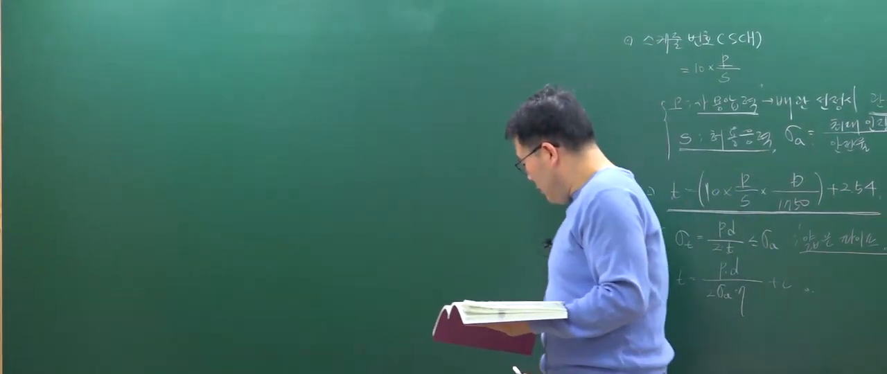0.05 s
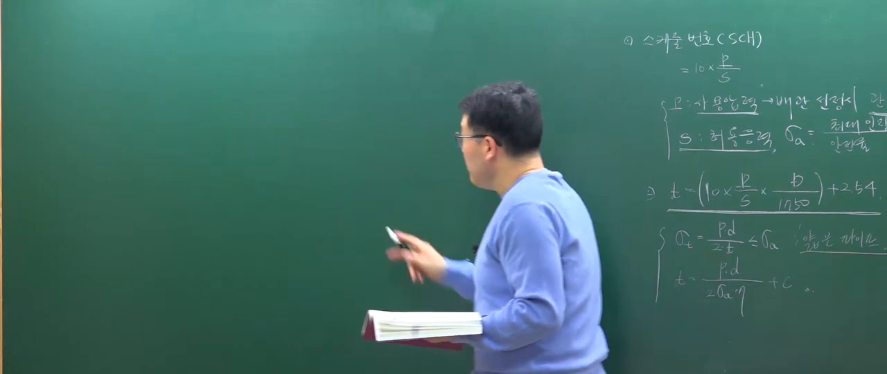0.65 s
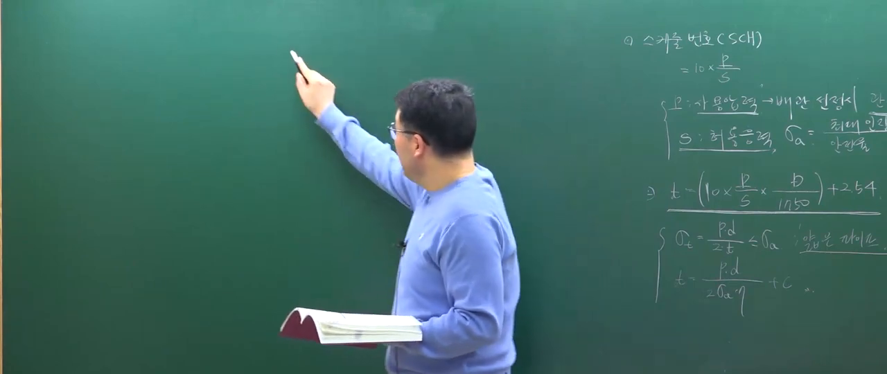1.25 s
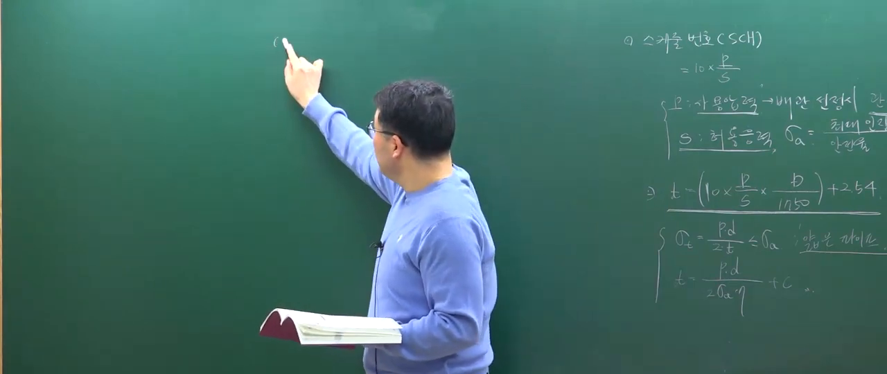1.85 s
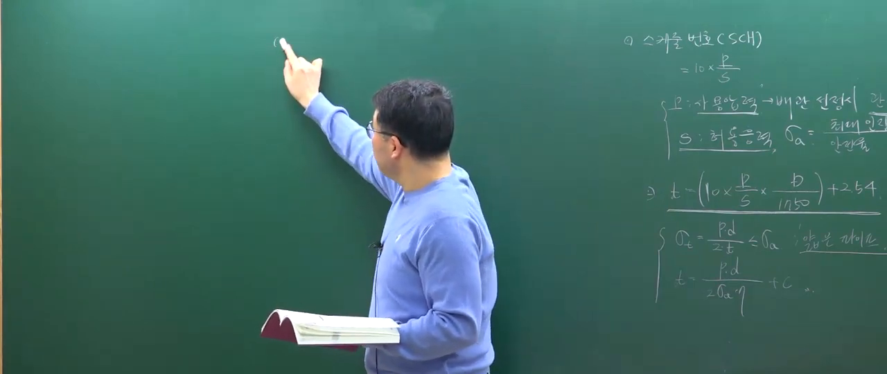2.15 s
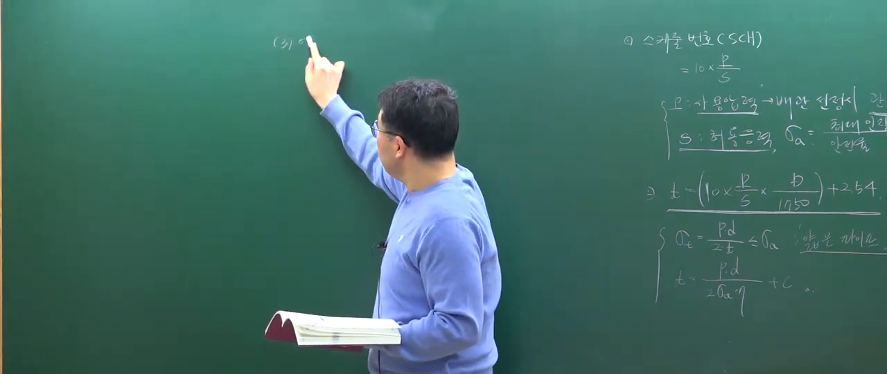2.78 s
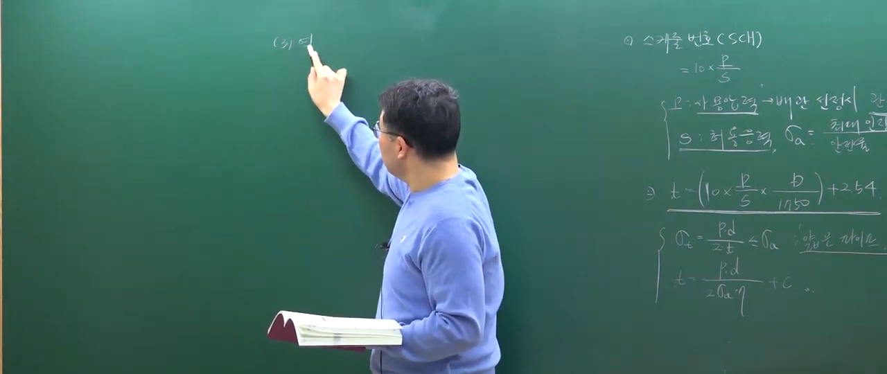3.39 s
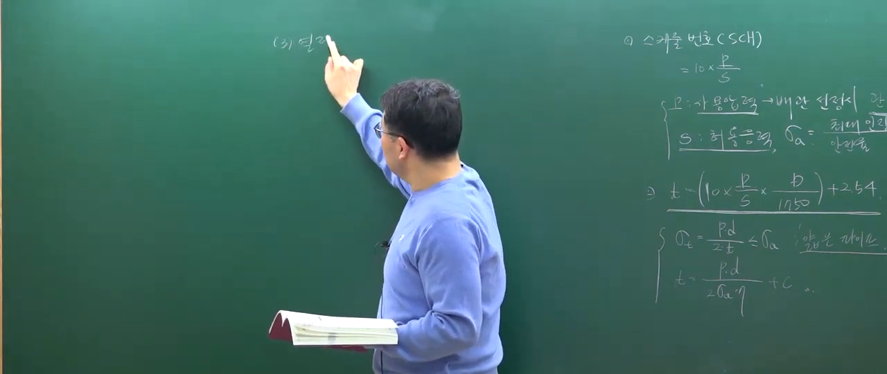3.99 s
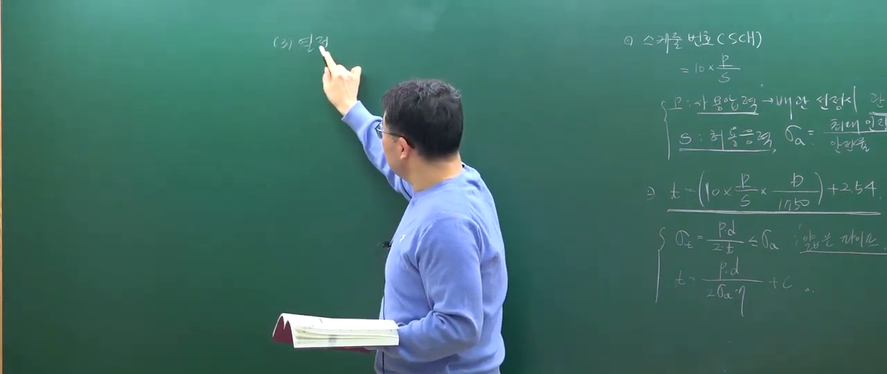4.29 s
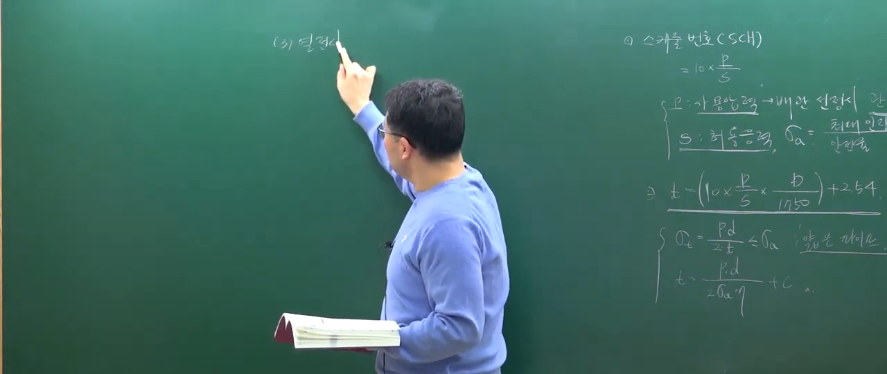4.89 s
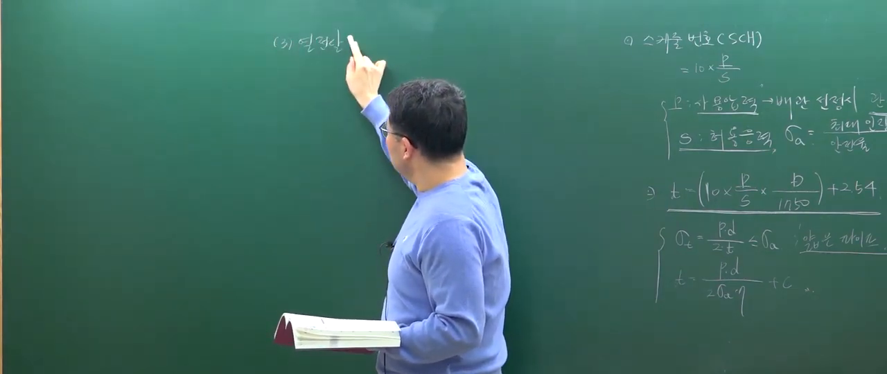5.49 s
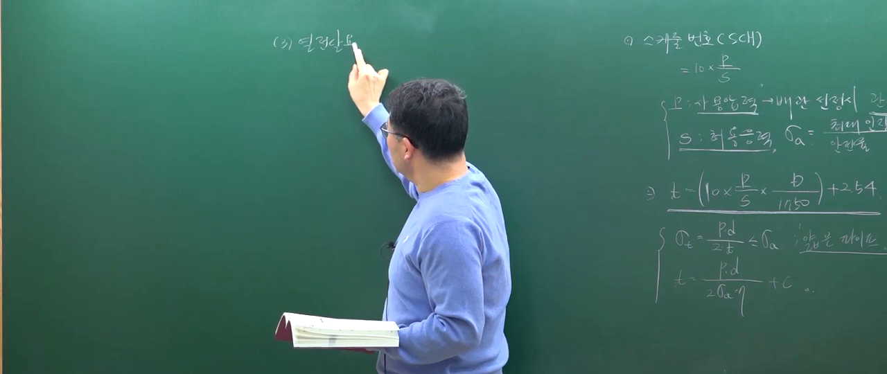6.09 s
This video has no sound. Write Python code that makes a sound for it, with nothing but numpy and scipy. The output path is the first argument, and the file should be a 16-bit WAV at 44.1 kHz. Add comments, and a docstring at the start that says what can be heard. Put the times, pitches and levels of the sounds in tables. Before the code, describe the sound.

Chalk taps and crunches on a large blackboard in an echoing classroom, after a brief clatter, a few knocks and a sleeve rustle.

```python
"""One microphone by a large blackboard in a live classroom, over low ventilation and hiss. Further off,
something clatters on the chalk ledge; the writer shifts with soft bumps, the ledge knocks three times
and a sleeve rustles as the arm goes up. Then the writing: each stroke starts with a firm tap, the chalk
tip crunches, the panel knocks and booms and the room rings on. After most taps the chalk slides away
with a faint gritty hiss."""
import sys
import numpy as np
from scipy import signal
from scipy.fft import rfft, irfft
from scipy.io import wavfile
from scipy.ndimage import uniform_filter1d

SR = 44100
rng = np.random.default_rng(int(sys.argv[2]) if len(sys.argv) > 2 else 0)


def digitize_waveform(pressure):
    """Quantize a signal to 16-bit integers and store it at the path in sys.argv[1].

    Rows of a 2-D input are taken as channels; values are limited to [-1, 1].
    """
    field = np.atleast_2d(pressure).T
    bounded = np.clip(field, -1, 1)
    quanta = np.round(bounded * 32767).astype(np.int16)
    wavfile.write(sys.argv[1], SR, quanta)


N = 275492
TIME = np.arange(N) / SR

# ventilation and hiss (frequency [Hz], level [dB])
ROOM_TONE_SPECTRUM = [(25, -14), (55, -1.5), (110, -6), (200, -11), (350, -30), (700, -27), (1500, -36),
                      (3500, -42.5), (15000, -41.5)]
# decay of the classroom's echo (frequency [Hz], t60 [s])
ECHO_DECAY = [(80, 0.9), (200, 0.65), (450, 1.0), (1200, 1.21), (2200, 0.96), (4500, 0.62), (8000, 0.47),
              (14000, 0.7)]
# colour of that echo (frequency [Hz], gain [dB])
ECHO_SPECTRUM = [(60, 0.5), (200, -4.5), (400, -2), (700, -4.5), (1300, -4.5), (2500, -5), (5000, -7.5),
                 (8000, -15.5), (14000, -25.5)]
# blows on the ledge (time [s], rattle level [dB], rattle length [s], level of the modes [dB])
CLATTER_BLOWS = [(0.016, -36, 0.0054, -30), (0.021, -42.5, 0.0047, -40.5), (0.027, -28.5, 0.07, -51),
                 (0.057, -31.5, 0.012, -47), (0.0625, -32.5, 0.11, -31.5), (0.075, -29, 0.021, -41)]
KNOCK_BLOWS = [(.737, -34.5, 0.029, -34.5), (.840, -32, 0.049, -36), (.902, -38.5, 0.058, -37)]
# their rattle, bright and dull (frequency [Hz], level [dB])
CLATTER_SPECTRUM = [(60, 1.5), (200, 4), (500, -1.5), (830, -2), (1200, 1.5), (1900, 3), (3200, -3),
                    (5000, -12), (8500, -18.5), (11000, -33), (15000, -39)]
KNOCK_SPECTRUM = [(40, -3.5), (100, -8), (170, 4), (270, -10), (380, 1), (480, 2), (600, -1.5),
                  (760, -12.5), (1200, -11), (2800, -20.5), (5000, -35), (14000, -48)]
# modes of the ledge (frequency [Hz], level [dB], t60 [s])
CLACK_MODES = [(560, -6, .014), (850, 0, .014), (1250, -8, .01)]
THUD_MODES = [(143.2, -7, 0.29), (254, 5.5, 0.083), (352, -5, 0.03)]
# soft bumps as the body shifts (time [s], level [dB], length [s])
BODY_BUMPS = [(.62, -49.5, 0.45), (.719, -39, 0.023), (1.211, -38, 0.026), (1.24, -38, 0.01),
              (1.295, -42, 0.069), (1.37, -55, 0.058)]
# sleeve sliding (middle time [s], length [s], level [dB])
SLEEVE_MOVES = [(1.25, 0.072, -52), (1.325, 0.033, -57)]
# colour of the bumps and of the sleeve (frequency [Hz], level [dB])
BUMP_SPECTRUM = [(30, -1), (90, 4.5), (165, 9), (270, -13.5), (480, -10), (750, -33), (1800, -24.5),
                 (4000, -59), (15000, -68)]
SLEEVE_SPECTRUM = [(200, 14.5), (1900, 2), (3500, -10), (6000, -14), (9500, -6), (15000, -13)]
# chalk landings (time [s], gain [dB], hardness [dB/octave], favoured band [Hz], hollow band [Hz], # weak band
# of the stick [Hz])
CHALK_TAPS = [(1.5767, -1.5, -1.5, 770, 218, 2500), (1.8503, 0, -0.5, 408, 1240, 3490),
              (2.2583, 2.2, 1.05, 353, 1240, 3640), (2.5415, -2, 0.5, 1920, 734, 3560),
              (2.9009, -0.5, 1.24, 930, 520, 3020), (3.0549, -7, -1.6, 821, 350, 1810),
              (3.323, 0.9, -0.1, 1760, 790, 2380), (3.6441, 3.5, .4, 1000, 643, 3040),
              (3.9455, -2.5, -.2, 1000, 340, 2700), (4.2898, 2.5, 0.8, 523, 1070, 2930),
              (4.4537, -.7, 0.34, 1360, 850, 2340), (4.7718, 3.5, 0.5, 1370, 860, 2230),
              (5.0274, -6, -0.34, 1170, 188, 2770), (5.1856, 2, .7, 1370, 580, 2180),
              (5.476, 2.5, -0.05, 1330, 660, 3240), (5.8262, -2, -0.3, 554, 926, 2550),
              (6.2225, 0.5, 0.96, 1730, 1010, 3550)]
# the panel bending, and the spot under the chalk giving way (frequency [Hz], level [dB], t60 [s])
BENDING_MODES = [(116.8, 0, 0.26), (150, -4, 0.33), (214.5, -9.5, 0.84), (233, 3.5, 0.09), (305, 0, 0.041),
                 (377.4, 6, 0.13), (449.2, 5, 0.12), (504, 4, 0.074)]
SPOT_MODES = [(208, 11.5, 0.027), (918, 10, 0.014), (1470, 1, 0.016)]
# dense upper panel modes, crushed chalk, what the panel sends into the room (frequency [Hz], level [dB])
PANEL_SPECTRUM = [(80, -4), (450, -11), (660, -22), (920, 3.5), (1500, -6.5), (2100, -10), (3200, -23.5),
                  (6000, -26), (15000, -32)]
CRUSH_SPECTRUM = [(200, -61), (1200, 22), (2400, 12), (3400, -0.5), (5000, -2), (7000, -3.5), (10000, -9),
                  (15000, -17.5)]
RADIATED_SPECTRUM = [(45, -17), (80, -19), (110, -8), (220, -2), (440, -3.5), (620, -12), (1000, -9),
                     (1600, -15.5), (2300, -24.5), (3100, -33), (4200, -33), (6500, -30.5), (10000, -31.5),
                     (15000, -31.5)]
# chalk sliding (middle time [s], length [s], level [dB])
CHALK_SLIDES = [(1.68, 0.13, -64), (1.94, 0.053, -61), (2.08, 0.14, -67), (2.81, 0.14, -74),
                (3.16, .16, -71), (3.42, 0.084, -60.5), (3.50, .05, -85), (4.18, 0.13, -73),
                (4.62, 0.064, -76), (4.91, 0.087, -64), (5.68, 0.1, -79), (5.97, .08, -66)]
# its gritty hiss (frequency [Hz], level [dB])
SLIDE_SPECTRUM = [(300, -20), (1500, -2), (4000, -35), (8000, 0), (15000, 4)]


def undb(db):
    """Decibels to gain."""
    return 10 ** (np.asarray(db) / 20)


def unit(x):
    """Scale to an rms of 1."""
    return x / np.sqrt(np.mean(x ** 2))


def at_level(x, db):
    """Scale a short sound so that its energy, spread over 40 ms, has this level."""
    return x * undb(db) * np.sqrt(.04 * SR / np.sum(x ** 2))


def lookup(points, hz):
    """Read (frequency [Hz], value) points on a log-frequency axis."""
    point_hz, value = np.transpose(points)
    return np.interp(np.log(np.maximum(hz, 1)), np.log(point_hz), value)


def colour(x, points, size=2048):
    """Minimum-phase filter through (frequency [Hz], gain [dB]) points."""
    cepstrum = irfft(np.log(undb(lookup(points, np.arange(size + 1) * SR / (2 * size)))))
    cepstrum[1:size] *= 2
    cepstrum[size + 1:] = 0
    return signal.fftconvolve(x, irfft(np.exp(rfft(cepstrum))))[:len(x)]


def band(x, hz, q):
    """One resonance, gain 1 at its centre."""
    return signal.lfilter(*signal.iirpeak(hz, q, fs=SR), x)


def fade(t, t60):
    """Fall by 60 dB in t60 seconds."""
    return np.exp(-np.log(1000) * t / t60)


def ring(modes, t):
    """Damped modes; neighbours swing in opposite directions."""
    return sum((-1) ** k * undb(db) * fade(t, t60) * np.sin(2 * np.pi * hz * t)
               for k, (hz, db, t60) in enumerate(modes))


def grains(size, spread_db):
    """Tiny fractures or contacts of unequal strength."""
    return unit(rng.standard_normal(size) * undb(spread_db * rng.standard_normal(size)))


def add(out, s, x):
    """Mix x into out from time s on."""
    start = max(int(s * SR), 0)
    out[start:start + len(x)] += x[:max(len(out) - start, 0)]


def room_tone(level_db=-57):
    """Steady ventilation rumble and hiss at the microphone."""
    return undb(level_db) * unit(colour(rng.standard_normal(N), ROOM_TONE_SPECTRUM))


def rattles(blows, spectrum, ring_db, ring_t60):
    """Loose blows: each is a burst of small contacts with a short ringing tail of noise."""
    out, t = np.zeros(N), TIME[:SR // 3]
    for s, db, length in blows:
        contacts = grains(len(t), spread_db=1.33) * np.exp(-(2 * t / length) ** 2)
        tail = undb(ring_db) * rng.standard_normal(len(t)) * fade(t, ring_t60)
        add(out, s, at_level(colour(contacts + tail, spectrum), db))
    return out


def ledge(blows, spectrum, modes, ring_db, ring_t60):
    """Something lands on the chalk ledge: each blow rattles and sets off a few damped modes."""
    out = rattles([row[:3] for row in blows], spectrum, ring_db, ring_t60)
    for s, _, _, modes_db in blows:
        add(out, s, at_level(ring(modes, TIME[:SR // 8]), modes_db))
    return out


def classroom(x, first_wall_s=0.0011, build_s=0.009):
    """Diffuse echo that builds up after the first wall; the midrange rings longest."""
    t = TIME[:SR]
    noise = rfft(rng.standard_normal(SR))
    build_up = np.clip((t - first_wall_s) / build_s, 0, 1)
    centres, response = np.array(ECHO_DECAY)[:, 0], 0
    for share, (_, t60) in zip(np.eye(len(centres)), ECHO_DECAY):
        noise_band = irfft(noise * lookup(np.c_[centres, share], np.arange(len(noise))))
        envelope = build_up * fade(t, t60)
        response = response + noise_band * envelope / np.sqrt(np.sum(envelope ** 2))
    return signal.fftconvolve(x, colour(response, ECHO_SPECTRUM))[:N]


def body_shifts():
    """The writer's body shifts at the board with soft, low bumps."""
    return rattles(BODY_BUMPS, BUMP_SPECTRUM, ring_db=-9, ring_t60=0.3)


def rubbing(moves, spectrum, spread_db, catch_hz, catch_db):
    """Friction: dense grains that swell and fade with each movement and catch unevenly on the way."""
    speed = sum(undb(db) * np.exp(-(2 * (TIME - s) / length) ** 2) for s, length, db in moves)
    catch = unit(uniform_filter1d(rng.standard_normal(N), int(SR / catch_hz)))
    friction = grains(N, spread_db) * undb(catch_db * catch)
    return speed * unit(colour(friction, spectrum))


def sleeve_rustle():
    """Cloth slides and catches as the arm goes up."""
    return rubbing(SLEEVE_MOVES, SLEEVE_SPECTRUM, spread_db=-3, catch_hz=66.7, catch_db=3.5)


def board_boom(t, frame_s=.011, radiate_hz=95):
    """The spot under the chalk gives way and bending waves spread through the panel."""
    # each place on the board favours other modes
    modes = [(hz * (1 + 0.013 * rng.standard_normal()), db + rng.standard_normal(), t60)
             for hz, db, t60 in BENDING_MODES]
    spot = at_level(ring(SPOT_MODES, t), -28)
    swing = at_level(ring(modes, t), -28) + spot
    # the long waves come back from the frame
    returned = signal.sosfilt(signal.butter(2, 600, fs=SR, output="sos"), spot)
    add(swing, frame_s * (1 + 0.1255 * rng.standard_normal()), undb(-3) * returned)
    # the panel is pushed away, and its slowest motion moves no air
    return -signal.sosfilt(signal.butter(2, radiate_hz, "high", fs=SR, output="sos"), swing)


def chalk_tap(force_peak_s=0.00025):
    """One landing, heard close: the board booms, its upper modes knock and the tip crushes."""
    t = TIME[:SR // 3]
    boom = board_boom(t)
    knock = at_level(colour(rng.standard_normal(len(t)) * fade(t, t60=0.13), PANEL_SPECTRUM), -33)
    force = t / force_peak_s * np.exp(1 - t / force_peak_s)
    crumbling = undb(-22) * fade(t, t60=0.21)
    fractures = grains(len(t), spread_db=1.2) * (force + crumbling)
    crunch = at_level(colour(fractures, CRUSH_SPECTRUM), -44)
    out = boom + knock + crunch
    # just after the peak of the force one larger flake snaps off
    snap = at_level(colour(signal.unit_impulse(len(t)), CRUSH_SPECTRUM), -39)
    add(out, rng.uniform(.0012, .0022), snap)
    # the crunch comes back from surfaces close by, which favour the middle of the treble
    bounced = colour(crunch, [(4000, -4), (7500, 7.5), (12000, 5)])
    for lag_s, echo_db in [(.0066, 0.082), (.0085, 1)]:
        add(out, lag_s * (1 + 0.053 * rng.standard_normal()), undb(echo_db) * bounced)
    return out


def hardness(x, db_per_octave, pivot_hz=1000):
    """A harder landing tilts the sound towards the treble."""
    return colour(x, [(hz, db_per_octave * np.log2(hz / pivot_hz)) for hz in (130, 14000)])


def tapping():
    """All taps with their echo; the angle of the chalk and the place on the board change their tone."""
    out = np.zeros(N)
    radiated = at_level(colour(signal.unit_impulse(SR // 10), RADIATED_SPECTRUM), -23)
    for s, gain_db, tilt, favoured_hz, hollow_hz, null_hz in CHALK_TAPS:
        # writer and chalk move on, so every tap takes other paths to the microphone
        hit = classroom(radiated)
        add(hit, 0, chalk_tap())
        # the spot lies on a crest of some panel modes and on a node of others
        hit += 0.65 * band(hit, favoured_hz, q=2.65)
        hit -= 0.7 * band(hit, hollow_hz, q=1.53)
        # the stick held in the fingers leaves one band weak
        hit -= 0.65 * band(hit, null_hz, q=5)
        # just above that band the stick rings briefly in the fingers
        hit += 1.1 * band(hit, 1.197 * null_hz, q=7)
        add(out, s, undb(gain_db) * hardness(hit, tilt))
    return out


def chalk_slides():
    """The tip drags over the board and sheds grains of very unequal strength."""
    return rubbing(CHALK_SLIDES, SLIDE_SPECTRUM, spread_db=8.5, catch_hz=110, catch_db=-1)


def scene(clatter_send_db=4, knock_send_db=1, body_send_db=-5):
    """Board, ledge and clothes in one room; the ledge is further from the microphone, so it is wetter."""
    slides = chalk_slides()
    clatter = ledge(CLATTER_BLOWS, CLATTER_SPECTRUM, CLACK_MODES, ring_db=-3, ring_t60=0.12)
    knocks = ledge(KNOCK_BLOWS, KNOCK_SPECTRUM, THUD_MODES, ring_db=-4.5, ring_t60=0.4)
    body = body_shifts() + sleeve_rustle()
    ledge_send = undb(clatter_send_db) * clatter + undb(knock_send_db) * knocks
    echo = classroom(ledge_send + undb(body_send_db) * body + slides)
    return (room_tone() + clatter + body + knocks + tapping() + slides + echo)[None]


def record(dry, top_hz=15900):
    """The microphone chain cuts the top steeply."""
    return signal.sosfilt(signal.ellip(8, .2, 70, top_hz, fs=SR, output="sos"), dry)


dry = scene()
out = record(dry)
digitize_waveform(out)
```